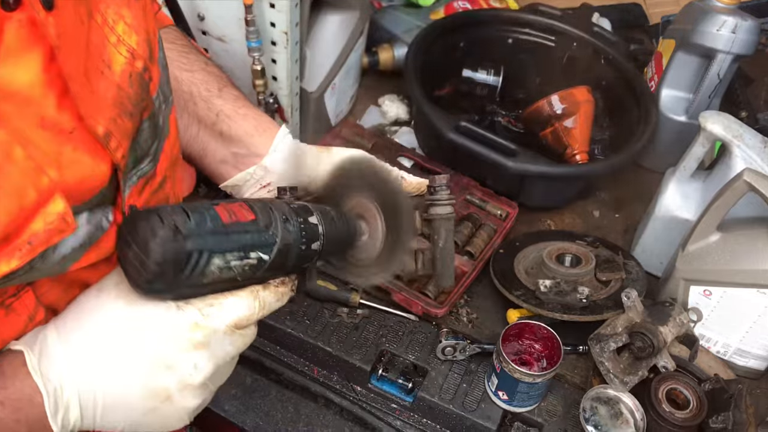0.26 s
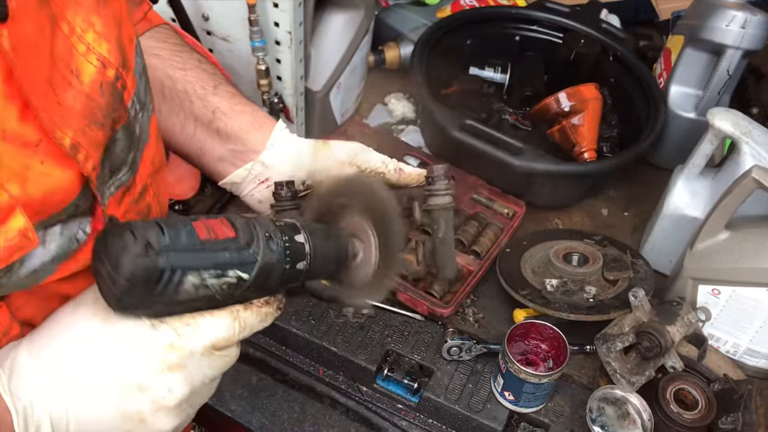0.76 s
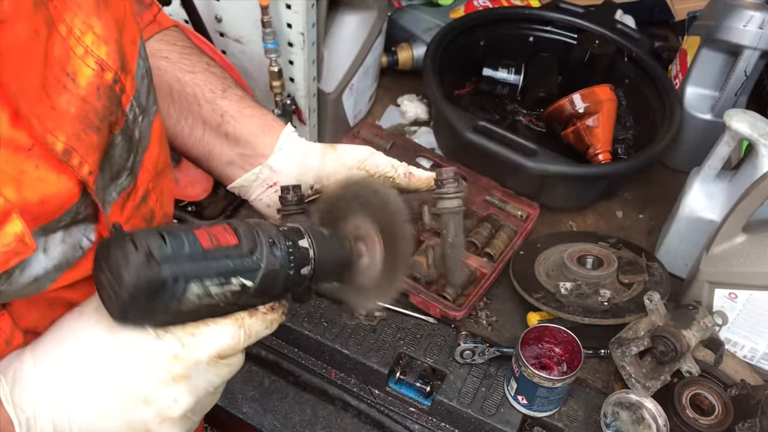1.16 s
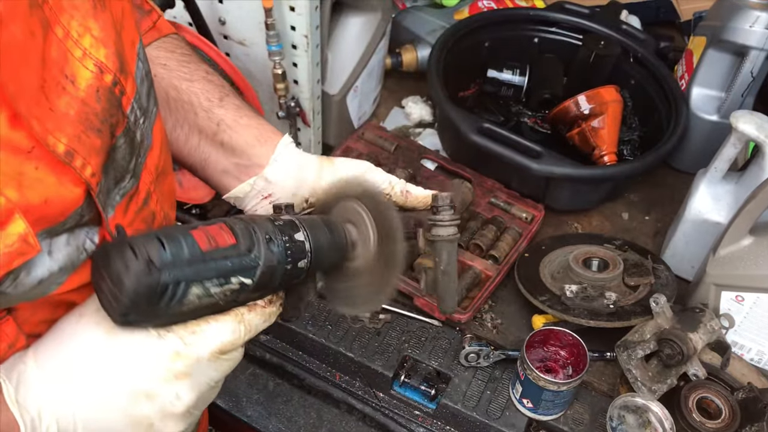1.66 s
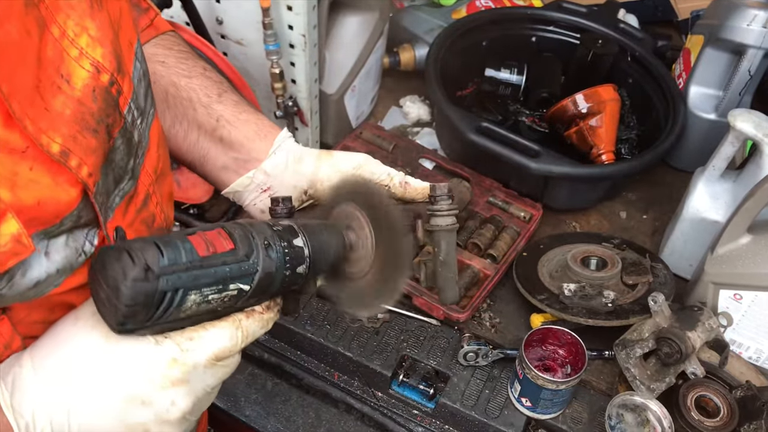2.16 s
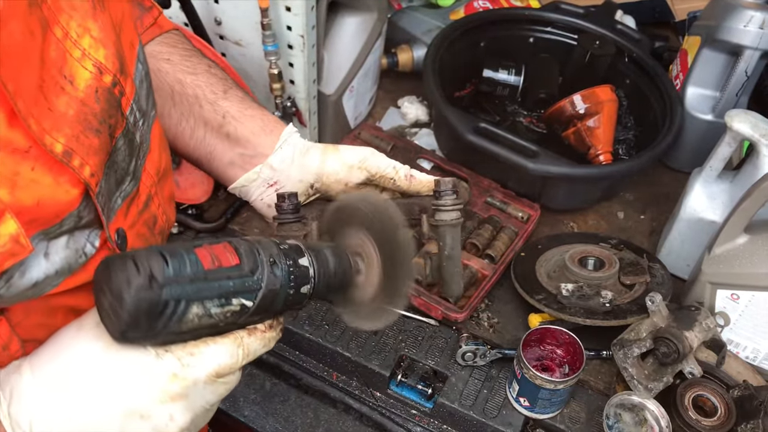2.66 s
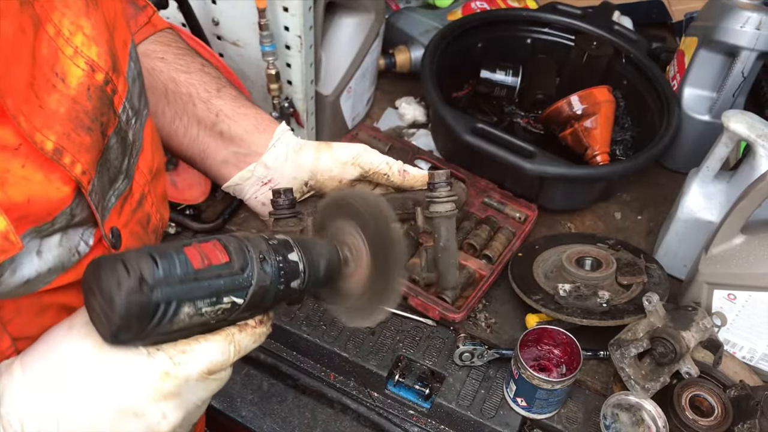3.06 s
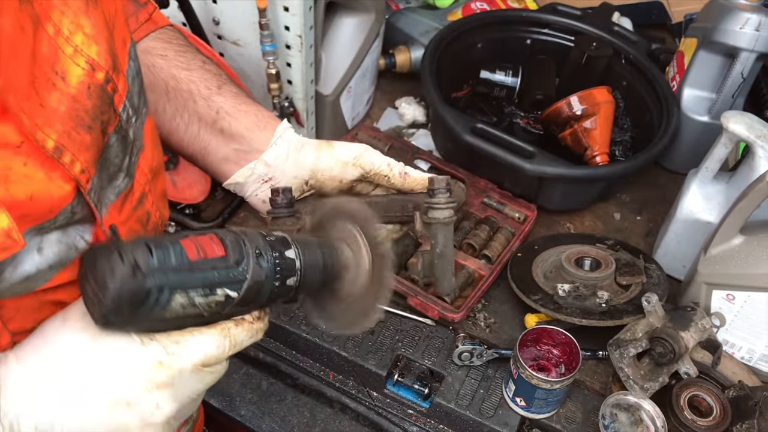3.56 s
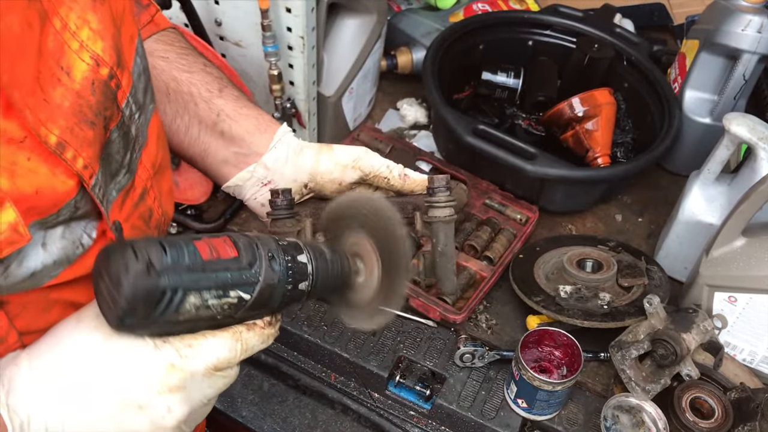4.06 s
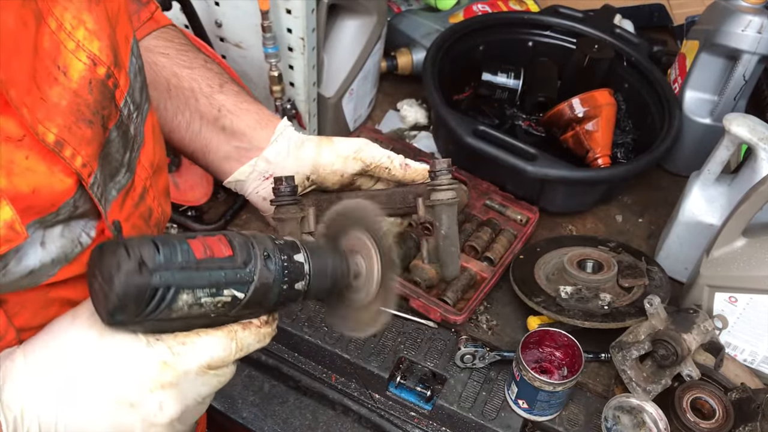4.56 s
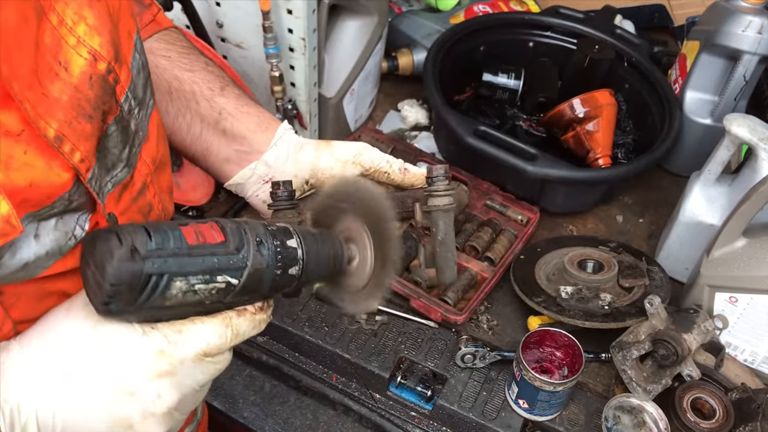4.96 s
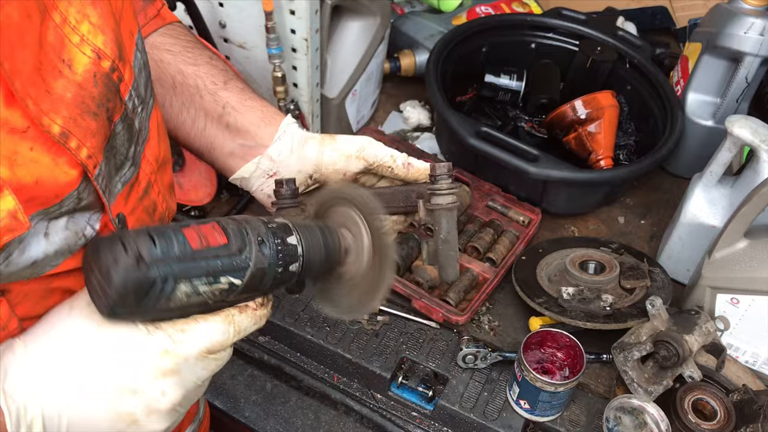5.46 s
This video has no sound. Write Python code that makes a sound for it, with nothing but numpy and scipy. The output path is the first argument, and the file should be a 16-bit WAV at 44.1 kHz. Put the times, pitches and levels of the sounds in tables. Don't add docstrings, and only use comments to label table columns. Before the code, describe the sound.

Continuous wire brushing on metal, already going at the start and cut off still running. Hissy, gritty bristle noise throbs in quick regular pulses over a nasal gear whine and steady fan air. Pressure eases briefly around half a second, then returns; speed wavers slightly. Dry, loud, close mono sound, centred, with low vibration underneath and only a slight workshop echo.

```python
import sys
import numpy as np
from scipy import signal
from scipy.fft import rfft, irfft, next_fast_len
from scipy.io import wavfile
from scipy.ndimage import uniform_filter1d, minimum_filter1d

SR = 44100
rng = np.random.default_rng(int(sys.argv[2]) if len(sys.argv) > 2 else 0)


def to_linear_factor(level_db):
    exponent = np.asarray(level_db, float) / 20
    return 10 ** exponent


def to_wav(sig):
    pcm = np.clip(np.atleast_2d(sig), -1, 1) * 32767
    pcm = np.round(pcm).astype(np.int16)
    wavfile.write(sys.argv[1], SR, pcm.T)


N = 251811

# (frequency [Hz], t60 [s])
ROOM_T60 = [(200, 0.21), (2000, 0.74), (10000, 0.53)]
# (frequency [Hz], density [dB per Hz])
RUMBLE_SPECTRUM = [(12, -41), (20, -21), (54, 3.5), (70, 3), (155, -8.5), (205, 0), (249, -1.5), (260, -37),
                   (340, -27), (570, -120)]
# (frequency [Hz], density [dB per Hz])
WHIRR_SPECTRUM = [(150, -50), (250, -24), (400, -19), (550, -25.5), (880, -17.5), (1140, -11), (2020, -4),
                  (2440, -11), (4200, -9.5), (5700, -7), (7700, -11), (11000, -14), (15800, -14.5)]
# (frequency [Hz], density [dB per Hz])
SCRUB_SPECTRUM = [(290, -31.5), (500, -27), (770, -16.5), (1140, -18.5), (2010, -2.5), (2400, -11.5),
                  (3000, -10.5), (4150, -10), (5800, -9.5), (7700, -16), (11000, -14.5), (15800, -21.5)]
# (centre [Hz], width [Hz], level [dB])
STEEL_MODES = [(1490, 250, 0), (1860, 650, 0.5), (3070, 210, -2), (3370, 50, 4.5), (4130, 720, 6),
               (4870, 180, -7), (5470, 780, 3), (7530, 650, -4), (8160, 520, 3.5), (9560, 760, 2),
               (10500, 450, -5.5), (11920, 610, 4), (13240, 710, 5.5), (15000, 740, 7), (14700, 220, -2)]
# (centre [Hz], slope [dB per unit tilt], level when untilted [dB])
TILT_BANDS = [(3600, 1.05, -0.1), (5900, -1.24, 0.7), (11000, 1.04, 0.98)]
# (time [s], extra pressure [dB], tilt towards the microphone [about -1..1])
HANDS = [(0, 1, 1.5), (.3, -2.5, 0.82), (.48, -4, 0.36), (.7, 0.5, 0.46), (1.1, 0.5, -0.32),
         (1.7, 0, -0.054), (2.05, -0.5, -0.35), (2.45, -0.5, .3), (2.7, 1, -0.8), (3.3, 1, -0.77),
         (3.9, 0, -0.83), (4.4, 0.5, -.7), (4.9, -0.5, -0.46), (5.15, 1.5, -0.11), (5.71, -1.5, -0.78)]
# (time [s], shaft speed [Hz])
SHAFT_SPEED = [(0.0, 297.5), (0.16, 293.8), (0.52, 313.0), (0.71, 299.9), (1.19, 285.6), (1.51, 285.6),
               (1.98, 305.4), (2.24, 298.1), (2.37, 301.0), (3.09, 292.2), (3.23, 285.5), (3.61, 277.6),
               (4.19, 296.1), (4.49, 292.9), (4.88, 303.5), (5.18, 291.7), (5.52, 287.8), (5.71, 296.3)]
# (multiple of shaft speed [-], level [dB], swell with the bite [dB], lag [turns],
# blur [Hz], speed slope [dB per %])
SHAFT_TONES = [
    (1, -44.3, 2.6, -.42, 1, .3),
    (2, -54, 1.1, 0, 1.5, 1.2),
    (3, -32.5, 1.1, .02, 2, .3),
]
# (multiple of shaft speed [-], level [dB], swell with the bite [dB], lag [turns],
# blur [Hz], speed slope [dB per %])
GEAR_TONES = [(2.327, -41.5, 3.5, -0.09, 4.6, -0.06), (4.63, -36.5, 5, -0.043, 15.35, 0.64),
              (6.06, -34.5, 1, -0.011, 40, -0.1), (6.876, -24.5, 6.5, 0.026, 7.1, 0.08),
              (9.16, -29, 3, 0.036, 6.03, -0.24), (11.43, -37, 3, 0, 35, 0),
              (13.77, -30, 3, -0.028, 30.4, 0.1), (20.62, -33.5, 5.5, 0.043, 49.6, -0.8),
              (4.98, -42.5, -1, 0, 9.8, 1.85), (16.18, -36.5, -2.5, 0, 40.5, -1),
              (16.87, -36, 1.5, 0, 38.3, 0.9), (18.33, -36.5, 6, -0.019, 41.4, 0),
              (24.2, -36.5, 4, 0.021, 79, 0.5)]

GEAR_RATIO, START_TURNS = 19.2051, -.348
LOAD_DB, LOAD_DB_PER_PRESSURE_DB, LOAD_SCATTER_DB = 3.44, 0.7, 0.2
SCRUB_DB, SCRUB_SCATTER_DB = -12, 1.05
PART_HZ, PART_WIDTH_HZ, PART_DB = 3040, 220, 11
RUMBLE_DB, RUMBLE_DRIFT_DB, RUMBLE_DB_PER_HZ = -47.5, 2.2, -0.22
WHIRR_DB, ROOM_DB, TOP_HZ = -17.0, -11.5, 15760


def unit(x):
    return x / np.sqrt(np.mean(x ** 2) + 1e-20)


def along(points, hz):
    f, v = np.transpose(points)
    return np.interp(np.log(hz + 1), np.log(f + 1), v)


def curves(rows):
    s, *cols = np.transpose(rows)
    return [np.interp(np.arange(N) / SR, s, c) for c in cols]


def wobble(rate_hz):
    knots = rng.standard_normal(int(N * rate_hz / SR) + 2)
    return np.interp(np.arange(N) * rate_hz / SR, np.arange(len(knots)), knots) * np.sqrt(3 / 2)


def filtered(x, response):
    m = next_fast_len(N + SR // 2)
    return irfft(rfft(x, m) * response(np.fft.rfftfreq(m, 1 / SR)), m)[:N]


def patchy(x, depth_db):
    z = signal.stft(x, nperseg=512)[2]
    field = uniform_filter1d(rng.standard_normal(z.shape), size=4, axis=0)
    field = uniform_filter1d(field, size=5, axis=1)
    return signal.istft(z * to_linear_factor(depth_db * unit(field)), nperseg=512)[1][:N]


def resonance(hz, centre_hz, width_hz):
    return 1 / (1 + (2 * (hz - centre_hz) / width_hz) ** 2)


def steel(hz):
    return to_linear_factor(sum(db * resonance(hz, centre_hz, width_hz) for centre_hz, width_hz, db in STEEL_MODES))


def wheel():
    return START_TURNS + np.cumsum(curves(SHAFT_SPEED)[0]) / SR / GEAR_RATIO


def bite(turns, edge, narrow):
    def rise(c):
        return np.tanh(edge * (c - narrow))
    return 2 * (rise(np.cos(2 * np.pi * turns)) - rise(-1.01)) / (rise(0.95) - rise(-1.35)) - 1


def each_bite(turns):
    whole = np.arange(-1, turns[-1] + 2)
    return np.interp(turns, whole, rng.standard_normal(len(whole)))


def shop(x):
    hz, t, z = signal.stft(rng.standard_normal(SR // 2), SR, nperseg=256)
    decay_db = -60 * t / along(ROOM_T60, hz)[:, None]
    tail = signal.istft(z * to_linear_factor(decay_db), SR, nperseg=256)[1]
    delayed = np.pad(x, (300, 0))
    return signal.fftconvolve(delayed, tail / np.linalg.norm(tail))[:N]


def rumble(turns):
    speed_hz = curves(SHAFT_SPEED)[0]
    lumps = to_linear_factor(.8 * wobble(8) + 2.2 * np.cos(2 * np.pi * (turns - .1)))
    shake = filtered(rng.standard_normal(N), lambda hz: to_linear_factor(along(RUMBLE_SPECTRUM, hz)))
    level_db = RUMBLE_DB + RUMBLE_DRIFT_DB * wobble(3.7) + RUMBLE_DB_PER_HZ * (speed_hz - np.mean(speed_hz))
    return to_linear_factor(level_db) * unit(lumps * shake)


def whirr():
    air = patchy(rng.standard_normal(N), depth_db=0.7)
    air = filtered(air, lambda hz: to_linear_factor(along(WHIRR_SPECTRUM, hz)) * steel(hz))
    return to_linear_factor(WHIRR_DB + 0.041 * wobble(2.07)) * unit(air)


def bristles(turns):
    def colour(hz):
        part_db = PART_DB * resonance(hz, PART_HZ, PART_WIDTH_HZ)
        return to_linear_factor(along(SCRUB_SPECTRUM, hz) + part_db) * steel(hz)

    ragged_turns = turns + 0.013 + 0.014 * wobble(10)
    contact = to_linear_factor(7.67 * (bite(ragged_turns, edge=1.3, narrow=0.18) - 1))
    struck = rng.random(N) < 12000 / SR
    strikes = struck * rng.standard_normal(N) * to_linear_factor(2.32 * rng.exponential(size=N))
    rubbing = 0.77 * rng.standard_normal(N)
    scrub = unit(filtered(patchy(strikes + rubbing, depth_db=1.14), colour))
    tufts_db = 0.09 * wobble(60) + 0.37 * wobble(250)
    level_db = SCRUB_DB + curves(HANDS)[0] + SCRUB_SCATTER_DB * each_bite(turns) + tufts_db
    return to_linear_factor(level_db) * contact * scrub


def gears(turns):
    mean_hz = curves(SHAFT_SPEED)[0]
    percent = 100 * (mean_hz / np.mean(mean_hz) - 1)
    depth = .021 * np.clip(1 - .05 * percent, 0, 2)
    angle = 2 * np.pi * (turns - .02)
    sag = 1 - depth * (np.sin(angle) - .1 * np.sin(2 * angle) - .18 * np.cos(2 * angle))
    shaft = 2 * np.pi * np.cumsum(mean_hz * sag) / SR
    pressure_db = curves(HANDS)[0]
    load_db = LOAD_DB + LOAD_DB_PER_PRESSURE_DB * pressure_db + LOAD_SCATTER_DB * each_bite(turns)
    sound = np.zeros(N)
    for multiple, db, swell_db, lag_turns, blur_hz, slope_db in SHAFT_TONES + GEAR_TONES:
        swell = bite(turns - lag_turns, edge=1.93, narrow=0.23)
        drift = 2 * np.pi * np.cumsum(blur_hz * wobble(240)) / SR
        share = swell_db / 6 * (1 + swell) / 2
        flutter_db = .12 * swell_db * wobble(300) + .1 * swell_db * wobble(4) * (multiple > 8)
        level_db = db + swell_db * swell + share * load_db + slope_db * percent + flutter_db
        sound += to_linear_factor(level_db) * np.sqrt(2) * np.sin(multiple * shaft + drift)
    return sound


def turned(x):
    tilt = curves(HANDS)[1]
    for centre_hz, tilt_db, level_db in TILT_BANDS:
        band = filtered(x, lambda hz: np.exp(-(np.log(hz / centre_hz + 1e-9) / 0.44) ** 2))
        x = x + (to_linear_factor(level_db + tilt_db * tilt) - 1) * band
    return x


def scene():
    turns = wheel()
    tool = gears(turns) + bristles(turns)
    airborne = tool + to_linear_factor(ROOM_DB) * shop(tool) + whirr()
    return np.tile(turned(airborne) + rumble(turns), (2, 1))


def top_cut(x):
    return signal.sosfilt(signal.butter(12, 16540, fs=SR, output="sos"), x)


def record(dry):
    needed = np.minimum(1, 1.04 / (np.abs(dry[0]) + 1e-9))
    gain = uniform_filter1d(minimum_filter1d(needed, size=181), size=181)
    mono = filtered(gain * dry[0], lambda hz: hz < TOP_HZ)
    return top_cut(np.tile(mono, (2, 1)))


dry = scene()
out = record(dry)
to_wav(out)
```